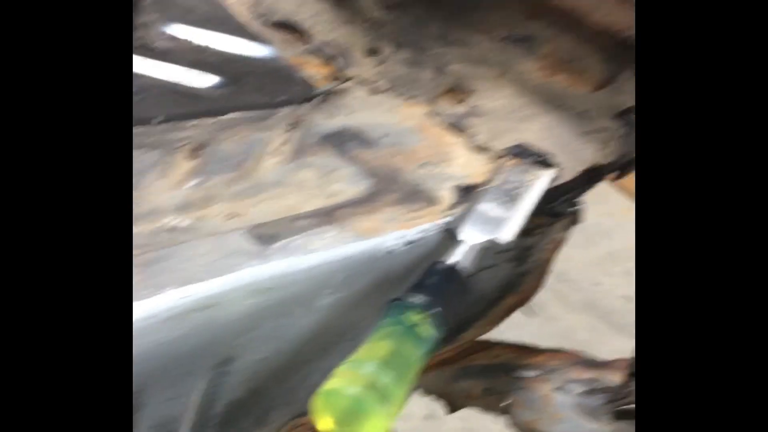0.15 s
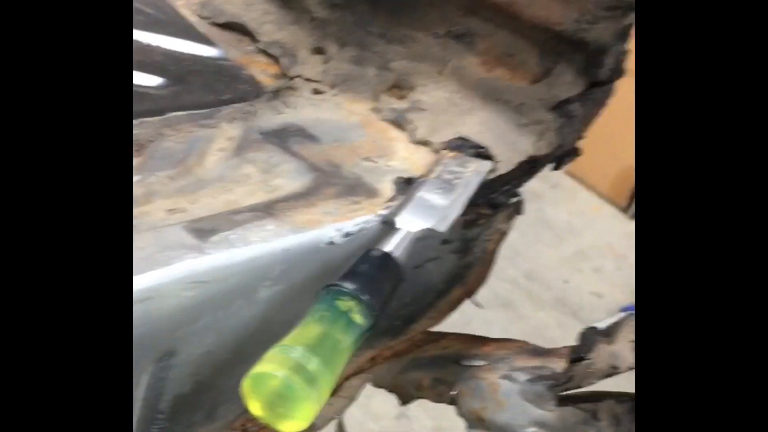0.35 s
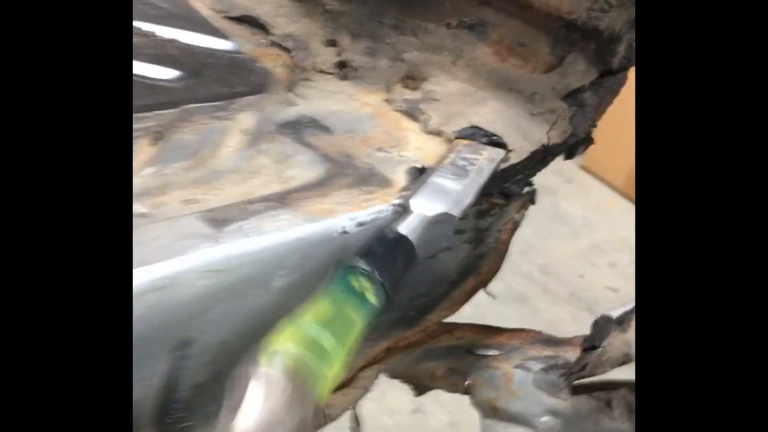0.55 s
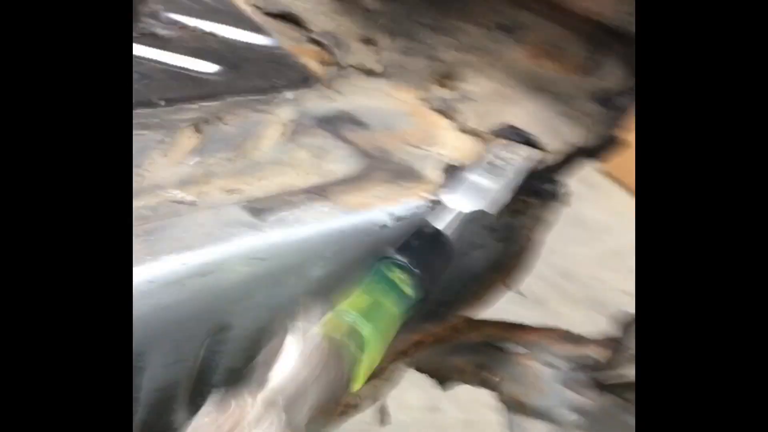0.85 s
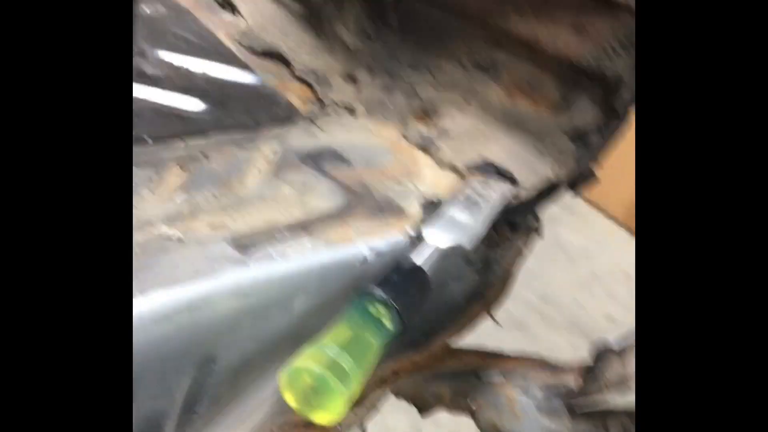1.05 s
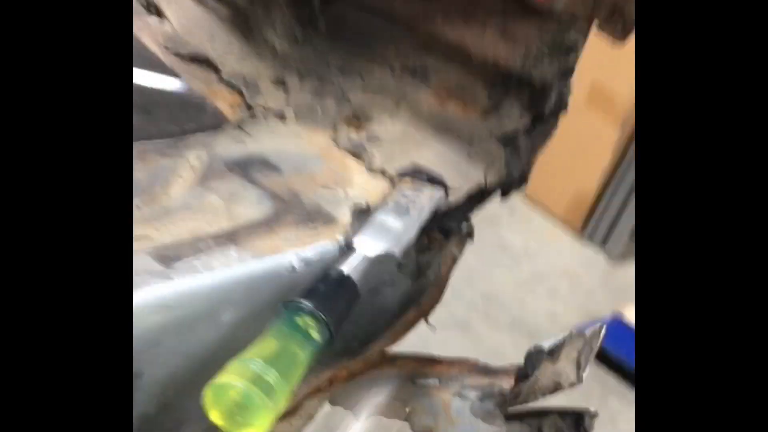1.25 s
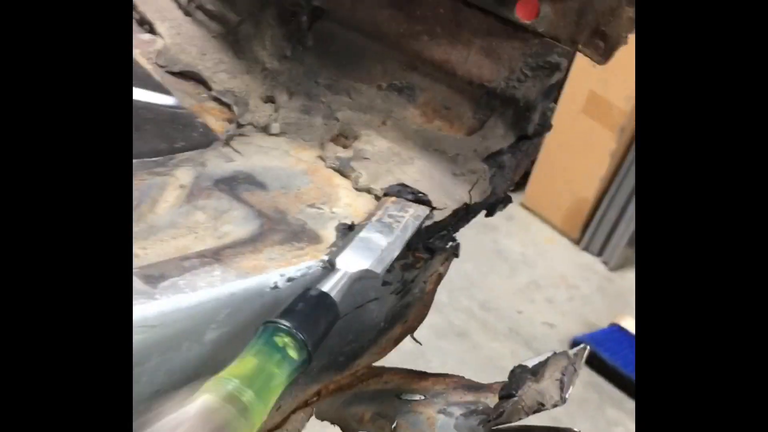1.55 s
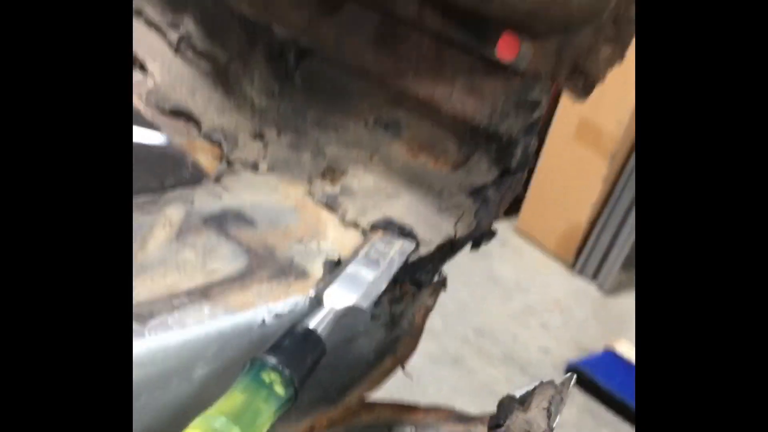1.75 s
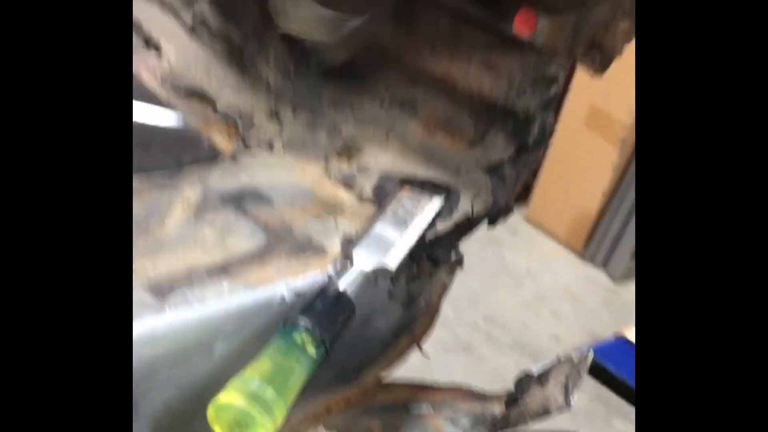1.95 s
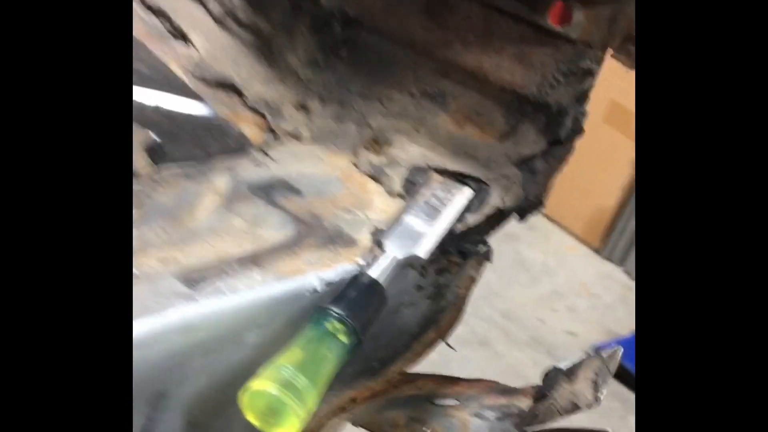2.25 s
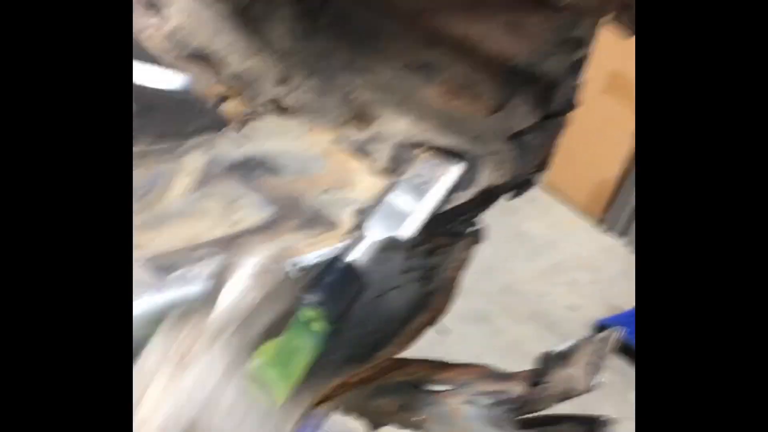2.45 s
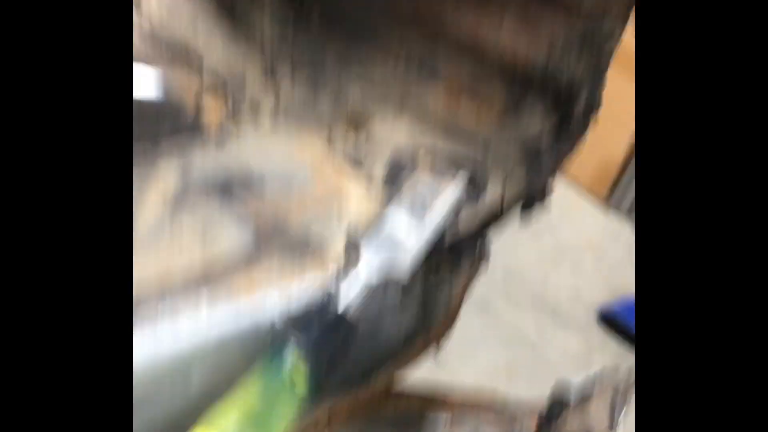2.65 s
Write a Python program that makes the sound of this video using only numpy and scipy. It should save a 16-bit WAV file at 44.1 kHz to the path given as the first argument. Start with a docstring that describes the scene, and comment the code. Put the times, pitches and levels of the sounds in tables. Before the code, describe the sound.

Loud, sharp hammer blows on a chisel make hollow sheet metal clang, close up in a garage

```python
"""Loud metallic blows crack, clang and ring on: a hammer drives a chisel into a rusty car body in a garage,
close to a phone. The clang's treble comes at once, its bass swells later; the chisel rebounds now and then.
Each blow sums a noise burst (crack), banded noise (dense sheet modes) and damped sines (clear modes);
the garage is a decaying noise tail, its quiet a steady coloured noise. Loud blows are limited."""
import sys
import numpy as np
from scipy import signal
from scipy.fft import rfft, irfft, next_fast_len
from scipy.io import wavfile
from scipy.ndimage import uniform_filter1d, minimum_filter1d

SR = 44100
rng = np.random.default_rng(int(sys.argv[2]) if len(sys.argv) > 2 else 0)


def gain_from_decibels(decibels):
    """Convert decibel values to linear amplitude factors."""
    exponent = np.asarray(decibels, float) / 20
    return 10 ** exponent


def master(y):
    """Save y as 16-bit WAV."""
    cut = np.clip(np.atleast_2d(y).T, -1, 1)
    pcm = np.round(cut * 32767)  # scale
    wavfile.write(sys.argv[1], SR, pcm.astype(np.int16))


N = 123479


def unit(x):
    """Scale to rms 1."""
    return x / np.sqrt(np.mean(x ** 2) + 1e-20)


def along(points, hz):
    """Interpolate (frequency [Hz], value) points on a log-frequency axis."""
    point_hz, value = np.transpose(points)
    return np.interp(np.log(hz + 1), np.log(point_hz + 1), value)


def noise(n, gain):
    """Gaussian noise of rms 1, coloured by gain(Hz)."""
    m = next_fast_len(n)
    spectrum = rfft(rng.standard_normal(m)) * gain(np.fft.rfftfreq(m, 1 / SR))
    return unit(irfft(spectrum, m)[:n])


def add(track, s, x):
    """Mix x in at time s; the track starts 1 s before time zero."""
    i = round(s * SR) + SR
    track[i:i + len(x)] += x[:len(track) - i]


def hammering():
    """All events on one track: blows, a light tap, chisel ticks and free shank rings."""
    # blows: (time [s], strength [dB], brightness [dB/octave], boom of the clang [dB], drum ring [dB],
    #         clank [dB], garage answer [dB])
    blows = [(-.09, -13, -9.5, -2, -4, -0.5, 9), (0.2031, -2.5, 1.5, -0.9, 4, -11, 1.5),
             (0.4813, -1.5, 0.93, -3.6, 1, 2.8, 2.7), (0.772, 0, -0.17, -5.3, -3.1, -1.7, 2.2),
             (1.0661, -6, -2.5, -10, 1, 4, -3.5), (1.445, -3.5, 2.25, 1.9, 2, 2.5, 1.2),
             (1.7641, -0.5, 0.36, -6.5, -10, 6.5, 3.5), (2.0728, -2, 1.6, -5, -6.5, 5, 1.8),
             (2.3849, -3, 1.55, 0, 2.7, 3.5, 0.76)]
    # light tap of the hammer on the plastic handle, one row: (time [s], strength [dB],
    #         brightness [dB/octave], boom [dB], drum ring [dB], clank [dB], garage answer [dB])
    tap = (2.0245, -17.5, 0.6, -1, -10, 7, 5)
    track = np.zeros(N + SR)
    for row in blows:
        strike(track, *row)
    strike(track, *tap, knock_db=27)
    add_ticks(track)
    add_shank_rings(track)
    return track[SR:]


def strike(track, s, db, bright, boom_db, drum_db, clank_db, wet_db, knock_db=0):
    """One blow excites crack, sheet, body and chisel; the garage answers, fed mostly by the dense clang."""
    # clear modes of the car body: (frequency [Hz], relative level [dB], t60 [s])
    body = [(65, -14, .3), (154.2, -14.5, 0.28), (202, -22, 0.13), (322, -15.5, 0.54), (450, -13.5, 0.28),
            (516, -22.5, 0.53), (668.4, -19.5, 0.61), (732.6, -15, .38), (918, -19, 0.29),
            (1087, -8, 0.092), (1440, -30.5, 0.34), (1600, -12.5, 0.18), (1850, -24, 0.083)]
    # main mode of the big panel: (frequency [Hz], relative level [dB], t60 [s])
    drum = [(258.5, -7, 0.35)]
    # knock of the plastic handle: (frequency [Hz], relative level [dB], t60 [s])
    handle = [(1130, -10, .014)]
    # ring of the chisel steel: (frequency [Hz], relative level [dB], t60 [s])
    chisel = [(3424, -16, 0.031), (4420, -24, 0.027), (5970, -11.5, 0.015), (6750, -22, 0.023)]
    crack_db, crack_t60_s, crack_rise_s = -9, 0.028, 0.00032
    clang_db, garage_db, modes_to_garage_db = -1.5, -21, -9

    t = np.arange(24000) / SR
    snap = gain_from_decibels(crack_db) * crack(t, crack_t60_s, bright)
    snap = snap * tone(4500, bright, 0) * (1 - np.exp(-t / crack_rise_s))
    dense = gain_from_decibels(clang_db) * clang(t, bright, boom_db)
    modes = ring(body, t, bright, boom_db)
    modes = modes + gain_from_decibels(drum_db) * ring(drum, t, 0, 0)
    modes = modes + gain_from_decibels(clank_db) * clank(t)
    modes = modes + gain_from_decibels(knock_db) * ring(handle, t, 0, 0)
    modes = modes + snap
    direct = dense + modes + ring(chisel, t, bright, 0)
    add(track, s, gain_from_decibels(db) * direct)
    to_garage = dense + gain_from_decibels(modes_to_garage_db) * modes
    add(track, s, gain_from_decibels(db + garage_db + wet_db) * garage(to_garage))


def crack(t, t60_s, bright):
    """Steel on steel: a short burst of coloured noise, decaying exponentially."""
    # spectrum of the crack: (frequency [Hz], relative level [dB])
    colour = [(300, -31), (1500, 6), (4000, 8), (8000, -10.5), (12000, -8), (16000, -15)]
    burst = noise(len(t), lambda hz: gain_from_decibels(along(colour, hz)) * tone(hz, bright, 0))
    return burst * gain_from_decibels(-60 * t / t60_s)


def clang(t, bright, boom_db):
    """Dense sheet modes: noise in overlapping bands, each swelling and dying at its own speed."""
    # dense modes of the sheet: (frequency [Hz], relative density [dB/Hz])
    density = [(24, -32), (40, -0.5), (256, -1.5), (516, -8.5), (1090, -8.5), (1270, -10), (1370, -8),
               (3060, -23), (8990, -35.5), (16000, -60.5)]
    # decay of the sheet: (frequency [Hz], t60 [s])
    decay = [(60, 0.35), (160, 0.35), (420, 0.43), (1100, 0.26), (2900, 0.22), (7700, .15), (15000, 0.21)]
    hz = np.fft.rfftfreq(len(t), 1 / SR)
    mids_hz = 40 * 2 ** (np.arange(19)[:, None] / 2)  # half-octave spacing
    masks = np.clip(1 - 2 * np.abs(np.log2((hz + 1) / mids_hz)), 0, 1)  # triangular
    sheet = noise(len(t), lambda f: gain_from_decibels(along(density, f)))
    bands = irfft(rfft(sheet) * masks, len(t))
    shaped = bands * tone(mids_hz, bright, boom_db) * fading(mids_hz, along(decay, mids_hz), t)
    return np.sum(shaped, 0)


def ring(modes, t, bright, boom_db):
    """Sum of damped sines; levels, phases and slight detuning are drawn anew at each call."""
    scatter_db, detune = 2.1, 0.006  # standard deviations; detune as a fraction of pitch
    hz, db, t60_s = np.transpose(modes)[:, :, None]
    size = gain_from_decibels(db + scatter_db * rng.standard_normal(hz.shape)) * tone(hz, bright, boom_db)
    hz = hz * (1 + detune * rng.standard_normal(hz.shape))
    sines = np.sin(2 * np.pi * (hz * t + rng.random(hz.shape)))
    return np.sum(size * sines * fading(hz, t60_s, t), 0)


def clank(t, count=16):
    """Damped modes near the edge, new for each spot struck, spread evenly over log frequency."""
    low_hz, high_hz = 951.4, 2254
    level_db, t60_s = -18.5, 0.085
    place = (np.arange(count) + rng.random(count)) / count
    mode_hz = low_hz * (high_hz / low_hz) ** place
    return ring([(hz, level_db, t60_s) for hz in mode_hz], t, 0, 0)


def tone(hz, bright, boom_db):
    """Gain of one blow: a tilt that sets in around 1.5 kHz, a boom shelf below 750 Hz."""
    tilt_db = bright * np.log2(1 + hz / 1500)
    shelf_db = boom_db / (1 + (hz / 750) ** 4)
    return gain_from_decibels(tilt_db + shelf_db)


def fading(hz, t60_s, t):
    """Modal envelope: swell over a few cycles, so bass rises later, then exponential decay."""
    swell_cycles = 3.5  # time constant
    return (1 - np.exp(-t * hz / swell_cycles)) * gain_from_decibels(-60 * t / t60_s)


def add_ticks(track):
    """Chisel rebounds and rust ticks: small cracks with a softened onset."""
    # (time [s], level before the rise [dB], brightness [dB/octave], t60 [s])
    ticks = [(0.105, -51, 12, 0.076), (.126, -55, 14, 0.1), (0.234, -22, 13, 0.044),
             (0.505, -18.5, 7, 0.053), (0.661, -66.5, 3, 0.05), (0.802, -19, 7.5, .04),
             (.955, -54, 8, 0.073), (1.097, -40.5, 0, 0.025), (1.789, -28.5, -11.2, 0.03),
             (2.052, -57, 4, .03), (2.11, -28, 3, .04), (2.26, -56, 3, 0.045), (2.425, -17.5, -2, 0.098)]
    rise_s = 0.007
    t = np.arange(12000) / SR
    for s, db, bright, t60_s in ticks:
        tick = crack(t, t60_s, bright) * (1 - np.exp(-t / rise_s))
        add(track, s, gain_from_decibels(db) * tick)


def add_shank_rings(track):
    """Free shank modes, modulated by low-passed noise as the loose shank chatters against the rust."""
    # free ring of the shank: (frequency [Hz], relative level [dB], t60 [s])
    shank = [(8080, -54, .12), (8300, -53, .12), (8480, -57, .15), (8530, -58, .15), (9200, -51.5, .12),
             (9250, -39.5, .15)]
    # rebounds that leave the shank free: (time [s], level [dB])
    rebounds = [(2.108, 6), (2.426, -3)]
    flutter_hz = 150
    t = np.arange(12000) / SR
    for s, db in rebounds:
        free_ring = ring(shank, t, 0, 0)
        chatter = noise(len(t), lambda hz: hz < flutter_hz)
        add(track, s, gain_from_decibels(db) * free_ring * chatter)


def garage(x):
    """Diffuse reverberation: a newly drawn noise tail, each frequency dying at its own speed."""
    # reverberation time: (frequency [Hz], t60 [s])
    decay = [(60, 4.7), (250, 2.05), (1000, 2.2), (2500, 1.5), (6000, 0.71), (14000, 0.37)]
    # colour of the tail: (frequency [Hz], relative level [dB])
    colour = [(60, 5.1), (250, 8.85), (1000, 3.93), (2500, 3.5), (6000, 3), (14000, 4)]
    fill_s = 0.02
    hz, t, z = signal.stft(rng.standard_normal(SR * 3 // 2), SR, nperseg=256)
    level_db = along(colour, hz)[:, None] - 60 * t / along(decay, hz)[:, None]
    shape = gain_from_decibels(level_db) * (1 - np.exp(-t / fill_s))
    tail = signal.istft(z * shape, SR, nperseg=256)[1]
    return signal.fftconvolve(x, tail / np.linalg.norm(tail))


def quiet_air():
    """Quiet of the garage: steady coloured noise."""
    # (frequency [Hz], relative density [dB/Hz])
    colour = [(25, -35), (60, -12.5), (130, -2), (250, -15.5), (700, -4.5), (1800, -7.5), (2800, -25.5),
              (5000, -41.5), (16000, -55.5)]
    rms_db = -42
    return gain_from_decibels(rms_db) * noise(N, lambda hz: gain_from_decibels(along(colour, hz)))


def scene():
    """Hammering over the quiet air of the garage, one channel."""
    return (hammering() + quiet_air())[None]


def roll_off(x):
    """The treble ends steeply here."""
    return signal.sosfilt(signal.butter(12, 16750, fs=SR, output="sos"), x)


def record(dry):
    """Band limit, fast peak limiter and soft clip."""
    low_cut_hz, top_hz, top_slope_hz = 34.4, 15900, 400
    ceiling, hold_s, knee = 1, 0.0023, 14  # knee: exponent, higher = harder clip
    m = next_fast_len(N + SR // 2)
    hz = np.fft.rfftfreq(m, 1 / SR)
    low_cut = (1j * hz / (low_cut_hz + 1j * hz)) ** 2  # two first-order high-passes
    high_cut = np.clip((top_hz - hz) / top_slope_hz, 0, 1)
    x = irfft(rfft(dry, m) * low_cut * high_cut, m)[:, :N]

    hold = round(hold_s * SR) + 1
    need = np.minimum(1, 1.17 * ceiling / (np.abs(x) + 1e-9))
    x = x * uniform_filter1d(minimum_filter1d(need, hold), hold)
    x = x / (1 + np.abs(x / ceiling) ** knee) ** (1 / knee)
    return roll_off(x)


dry = scene()
out = record(dry)
master(out)
```